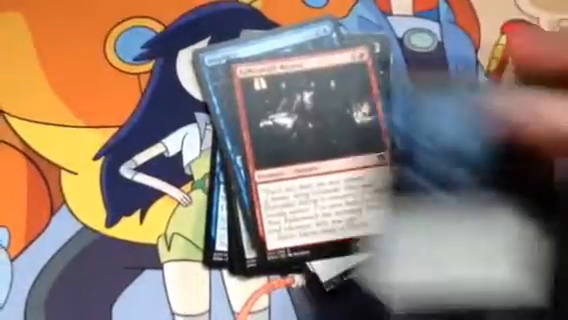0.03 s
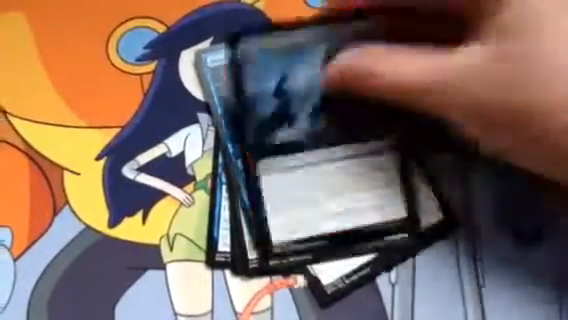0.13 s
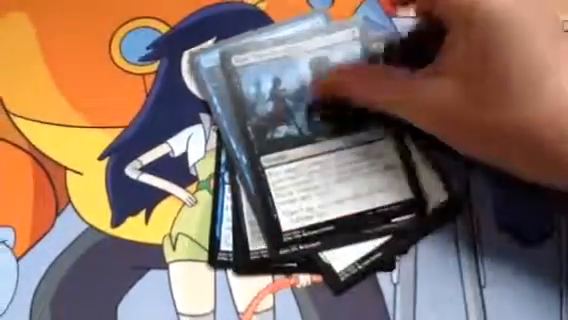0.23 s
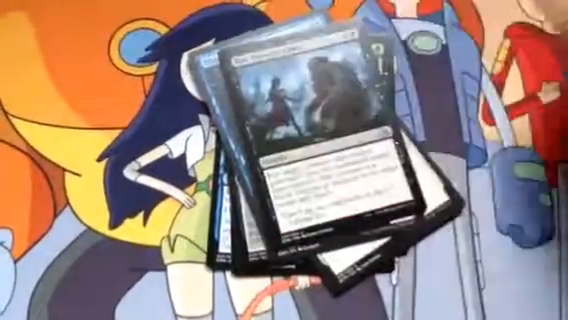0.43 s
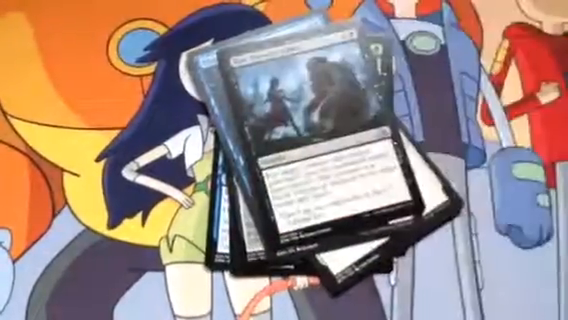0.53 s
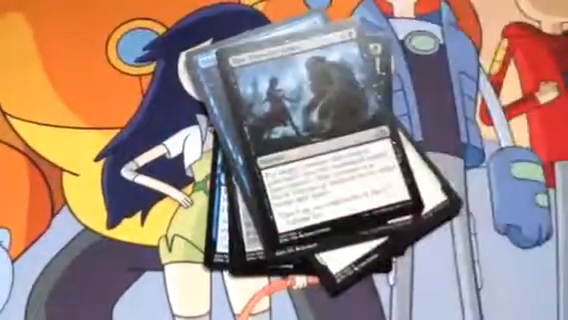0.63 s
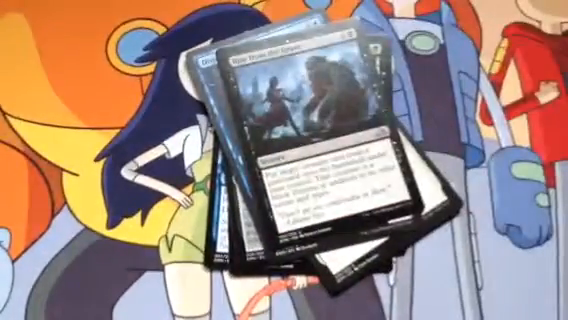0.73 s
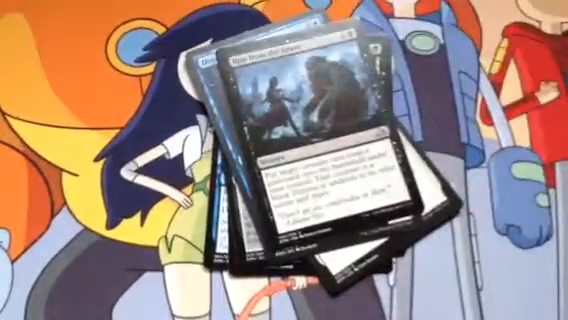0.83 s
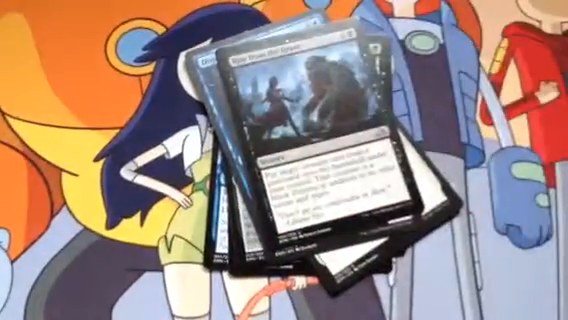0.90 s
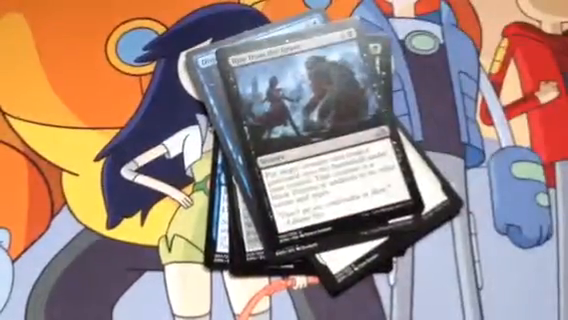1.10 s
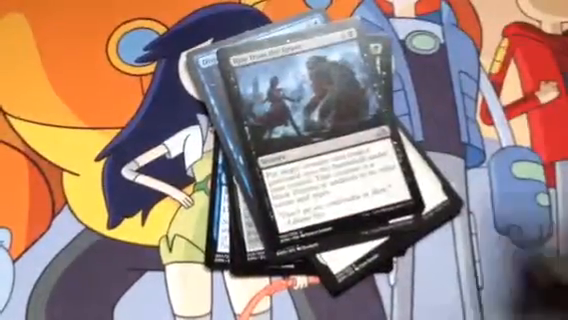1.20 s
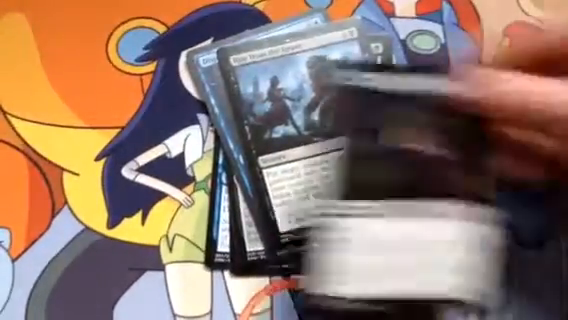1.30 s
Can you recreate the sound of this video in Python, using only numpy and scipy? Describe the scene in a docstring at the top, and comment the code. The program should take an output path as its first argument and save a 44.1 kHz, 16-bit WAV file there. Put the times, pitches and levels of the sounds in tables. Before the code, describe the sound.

A stiff card snaps onto a pile on a cloth mat, miked closely in a small room. Faint brushing opens; tiny ticks at 0.17 s, a dull knock at 0.24, then a loud, bright double-edged snap at 0.26 with a short room tail. A faint slide follows around 0.55-0.75, a weak rub near 1.0, and a crisp papery swish at 1.07-1.15, over a low faint room hum.

```python
"""A stiff card's bent edge snaps off the finger onto a pile on a cloth mat, close by in a small room.
The snap is made of short pushes that ring the edge, each with a small puff of air.
Before it the card ticks against the pile and is pressed down with a knock, both ringing too.
Shaped noise makes the rasps of the edge, the brush of the mat and the slides, as the next card is
pushed across the stack and pulled free with a swish. Gain control turns the sound down after the snap."""
import sys
import numpy as np
from scipy import signal
from scipy.fft import rfft, irfft
from scipy.io import wavfile
from scipy.ndimage import uniform_filter1d

SR = 44100
rng = np.random.default_rng(int(sys.argv[2]) if len(sys.argv) > 2 else 0)


def put_to_file(sound):
    """Save the sound as 16-bit audio at rate SR, in the file named by the first command-line argument."""
    columns = np.atleast_2d(sound).T  # one column per channel
    safe = np.clip(columns, -1, 1)
    whole_steps = np.round(safe * 32767)
    wavfile.write(sys.argv[1], SR, whole_steps.astype(np.int16))


N = 59535
TIME = np.arange(N) / SR  # seconds


def from_db(db):
    """Turn decibels into a gain."""
    return 10 ** (np.asarray(db) / 20)


def rms_one(x):
    """Scale a sound to an rms of 1."""
    return x / np.sqrt(np.mean(x ** 2) + 1e-20)


def noise(colour):
    """Random noise of rms 1, its spectrum drawn through points of (Hz, dB)."""
    hz, db = np.transpose(colour)
    bins_hz = np.maximum(np.fft.rfftfreq(N, 1 / SR), 1)
    gain = from_db(np.interp(np.log(bins_hz), np.log(hz), db))
    return rms_one(irfft(rfft(rng.standard_normal(N)) * gain, N))


def low_pass(x, hz, order=2):
    """Soften a sound by taking away what lies above a frequency (Butterworth)."""
    sos = signal.butter(order, min(hz, SR / 2 - 1000), fs=SR, output="sos")
    return signal.sosfilt(sos, x + 1e-18)


def drift(hz):
    """Random wandering with a spread of 1, no faster than about hz."""
    # the first half is dropped, so that the filter has settled
    return rms_one(low_pass(rng.standard_normal(2 * N), hz)[N:])


def clicks(rows):
    """One single-sample push for each (seconds, dB)."""
    out = np.zeros(N)
    for s, db in rows:
        out[int(s * SR)] += from_db(db)
    return out


def ring(force, modes):
    """A struck thing rings at several pitches at once, each dying away at its own pace."""
    out = np.zeros(N)
    for hz, db, t60 in modes:
        r = np.exp(-np.log(1000) / (t60 * SR))  # shrinkage per sample: 60 dB in t60 seconds
        w = 2 * np.pi * hz / SR
        out += from_db(db) * signal.lfilter([.5, 0, -.5], [1, -2 * r * np.cos(w), r * r], force + 1e-18)
    return out


# The edge leaves the finger, then slaps the pile. Each row: time in seconds, strength of the push in dB,
# brightness of the contact in Hz, peak of the air puff in dB.
SNAPS = [(0.2624, -7, 8680, -24), (0.2649, -3.5, 14940, -36)]
# How the free edge rings. Each row: pitch in Hz, level in dB, time to fall by 60 dB in seconds.
EDGE_MODES = [(1150, -26, 0.0038), (2300, -22.5, .011), (2850, -24, 0.006), (5100, -22, .004),
              (7090, -11.5, 0.0063), (8120, -7.5, 0.0049), (9425, -7, 0.0024), (11330, -3.5, .003),
              (14060, -14, .002)]
PUFF_HZ, PUFF_DELAY_S = 800, 0.0009


def snap():
    """Each contact rings the card's edge and squeezes out a puff of air."""
    out = np.zeros(N)
    for s, db, bright_hz, puff_db in SNAPS:
        push = low_pass(clicks([(s, db)]), bright_hz)
        puff = low_pass(clicks([(s + PUFF_DELAY_S, 0)]), PUFF_HZ)
        out += ring(push, EDGE_MODES) + from_db(puff_db) * puff / puff.max()
    return out


# The finger presses the card onto the pile. Each row: time in seconds, strength of the push in dB.
KNOCKS = [(0.2399, -15.5)]
# How the pile on its mat rings. Each row: pitch in Hz, level in dB, time to fall by 60 dB in seconds.
PILE_MODES = [(402, -7.5, 0.015), (763, -9.5, .011), (1750, 4, 0.0028), (5800, 9, .0014)]
FINGER_SOFTNESS_HZ = 2250


def knock():
    """A soft finger gives a dull push, and the pile rings with it."""
    return ring(low_pass(clicks(KNOCKS), FINGER_SOFTNESS_HZ), PILE_MODES)


# The card's corner touches the pile. Each row: time in seconds, strength of the push in dB.
TICKS = [(0.1747, -29.5), (0.1764, -32.5), (0.1842, -42.5)]
# How the corner rings. Each row: pitch in Hz, level in dB, time to fall by 60 dB in seconds.
TICK_MODES = [(638, -11.5, 0.0086), (1510, -1, 0.0077), (2060, -6, 0.013), (2840, -7, 0.0069),
              (6600, -3, .003), (8800, -6.5, 0.0015), (13000, -14, 0.0016)]


def ticks():
    """Hard, very short touches ring the card's corner."""
    return ring(clicks(TICKS), TICK_MODES)


# The edge rasps as it makes or breaks contact. Each row: time of the peak in seconds, level in dB,
# attack in seconds, decay in seconds (both over 20 dB).
RASPS = [(0.1743, -40, .001, 0.0067), (0.263, -15.5, 0.0024, 0.0023), (0.2650, -24, .0006, 0.0063),
         (0.2724, -39, .001, 0.0067), (0.865, -66, 0.025, 0.015), (1.118, -48, 0.0096, 0.01),
         (1.152, -47.5, 0.0053, .007), (1.227, -62.5, 0.04, 0.021)]
# The colour of the rasps. Each row: frequency in Hz, relative level in dB.
RASP_COLOUR = [(100, -31), (450, -13), (2400, -8), (3700, -16.5), (5200, -4), (7500, -1.5), (11500, -6),
               (15500, -9)]


def rasps():
    """Short bursts of friction at the card's edge: noise that swells and fades."""
    level = np.zeros(N)
    for s, db, attack, decay in RASPS:
        fade = np.maximum((s - TIME) / attack, (TIME - s) / decay)
        level += from_db(db - 20 * fade)
    return level * noise(RASP_COLOUR)


# A card slides on card, or the hand brushes the mat. Each row: start in seconds, attack in seconds,
# hold in seconds, release in seconds, level in dB, name of the colour. Attack and release are over 20 dB.
SLIDES = [(0.0, 0.0055, 0.16, .2, -64.5, "cloth"), (0.165, 0.009, .078, 0.024, -54.5, "settle"),
          (0.524, 0.035, .105, .12, -53.5, "push"), (0.667, 0.036, 0.038, .04, -62, "push"),
          (0.904, 0.2, 0.032, 0.13, -61, "settle"), (1.062, 0.03, 0.022, 0.029, -42, "pull")]
# The colours of the slides and of the brushed mat. Each row: frequency in Hz, relative level in dB per Hz.
SETTLE_COLOUR = [(100, -12), (400, -2.5), (2000, 3.5), (3300, -4.5), (7000, -1.5), (10000, 2), (12300, -3),
                 (15000, -3)]
PUSH_COLOUR = [(500, -11.5), (1150, -12), (1750, 0.5), (2200, -3.5), (2700, -8), (3400, -11.5),
               (3850, -2.5), (4400, -6), (5300, -3.5), (7500, -8), (11000, -10), (15000, -12.5)]
PULL_COLOUR = [(300, -33), (1200, -21), (1800, -7), (2700, -19.5), (4200, -5.5), (6200, 0.5), (8000, -3.5),
               (11000, 0), (15000, -2.5)]
CLOTH_COLOUR = [(40, -24), (130, -5), (300, 1), (700, -2), (1200, -11), (4000, -26), (12000, -33.5)]
FRICTION_FLUTTER_DB, FLUTTER_HZ = 0.88, 152


def slides():
    """Rubbing makes a fluttering hiss, in strokes that swell, hold and fade."""
    colours = {"settle": SETTLE_COLOUR, "push": PUSH_COLOUR, "pull": PULL_COLOUR, "cloth": CLOTH_COLOUR}
    out = np.zeros(N)
    for start, attack, hold, release, db, colour in SLIDES:
        before = (start + attack - TIME) / attack
        after = (TIME - start - attack - hold) / release
        fade = np.maximum(0, np.maximum(before, after))
        flutter_db = FRICTION_FLUTTER_DB * drift(FLUTTER_HZ)
        out += from_db(db - 20 * fade + flutter_db) * noise(colours[colour])
    return out


# The colour of the reflections. Each row: frequency in Hz, level in dB on top of ROOM_DB.
ROOM_COLOUR = [(200, -6.5), (600, -2), (1200, -5), (2200, -4.5), (4000, -1.5), (6500, -3.5), (10000, 0.5),
               (14000, 5.5)]
# The reflections are made in bands between these neighbouring edges, in Hz.
ROOM_BAND_EDGES_HZ = [100, 400, 900, 1600, 3000, 5000, 8000, 12000, 18000]
ROOM_DB, ROOM_T60_S, ROOM_BUILD_S = -12.5, 0.3, 0.0074
WALL_ECHO_S, WALL_ECHO_DB, WALL_SPREAD_S = 0.037, -2.5, 0.0029


def room(x):
    """Diffuse reflections: each band's energy dies away as noise, with a swell from the nearest wall."""
    wall = from_db(WALL_ECHO_DB) * np.exp(-((TIME - WALL_ECHO_S) / WALL_SPREAD_S) ** 2)
    build = 1 - np.exp(-TIME / ROOM_BUILD_S)
    fall = np.exp(-np.log(1000) * TIME / ROOM_T60_S)
    decay = (build * (1 + wall) * fall) ** 2  # squared: energy
    hz, db = np.transpose(ROOM_COLOUR)
    out = np.zeros(N)
    for low, high in zip(ROOM_BAND_EDGES_HZ, ROOM_BAND_EDGES_HZ[1:]):
        band = signal.butter(3, [low, high], "band", fs=SR, output="sos")
        direct = signal.sosfilt(band, x + 1e-18)
        energy = np.abs(signal.fftconvolve(direct ** 2, decay / decay.sum())[:N])
        middle = np.log(low * high) / 2  # log of the band's centre frequency
        gain = from_db(ROOM_DB + np.interp(middle, np.log(hz), db))
        out += gain * np.sqrt(energy) * rms_one(signal.sosfilt(band, rng.standard_normal(N)))
    return out


# The background of the room. Each row: frequency in Hz, relative level in dB per Hz.
FLOOR = [(25, -33), (60, -22), (110, -5.5), (180, 2.5), (300, 0.5), (500, -6.5), (1000, -11), (2000, -14.5),
         (3200, -19), (8000, -21), (15000, -23)]
FLOOR_DB, FLOOR_WAVER_DB = -61.5, .7


def background():
    """The room's faint steady noise, wavering a little in level."""
    return from_db(FLOOR_DB + FLOOR_WAVER_DB * drift(18)) * noise(FLOOR)


def scene():
    """One card is laid down and the next is drawn, over the room's background."""
    cards = snap() + knock() + ticks() + rasps() + slides()
    return (cards + room(cards) + background())[None]


AGC_THRESHOLD_DB, AGC_SLOPE = -31.5, .54  # slope: dB turned down per dB above the threshold
AGC_RELEASE_DB_PER_S, AGC_ATTACK_S = 8.5, 0.054
MIC_LOW_CUT_HZ, CUTOFF_HZ = 120, 15400


def record(dry):
    """Gain control ducks after loud peaks and recovers slowly; deep bass is thinned and the top is cut."""
    power = np.abs(uniform_filter1d(dry[0] ** 2, size=128))
    level_db = 10 * np.log10(power + 1e-12)
    wanted_db = AGC_SLOPE * np.maximum(level_db - AGC_THRESHOLD_DB, 0)
    # hold the deepest duck so far, let go at a steady rate
    recovery = AGC_RELEASE_DB_PER_S * TIME
    duck_db = np.maximum.accumulate(wanted_db + recovery) - recovery
    r = np.exp(-1 / (AGC_ATTACK_S * SR))
    smooth_duck_db = signal.lfilter([1 - r], [1, -r], duck_db)
    ducked = dry * from_db(-smooth_duck_db)
    thinned = signal.sosfilt(signal.butter(1, MIC_LOW_CUT_HZ, "high", fs=SR, output="sos"), ducked)
    return signal.sosfilt(signal.ellip(10, .2, 70, CUTOFF_HZ, fs=SR, output="sos"), thinned)


dry = scene()
out = record(dry)
put_to_file(out)
```